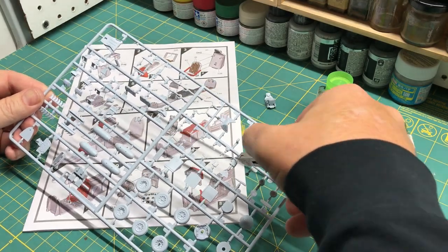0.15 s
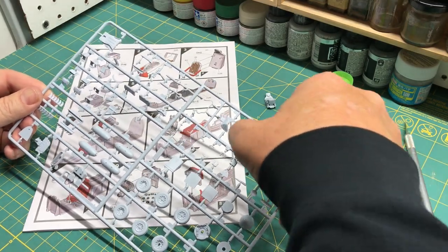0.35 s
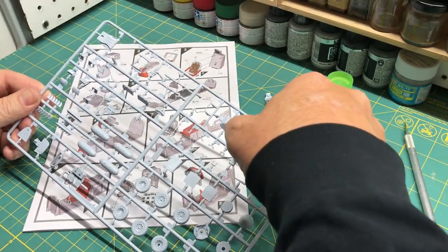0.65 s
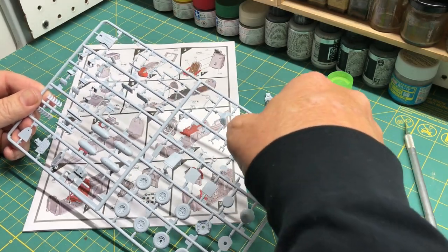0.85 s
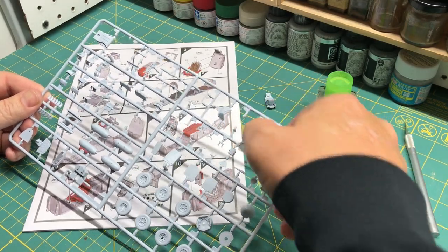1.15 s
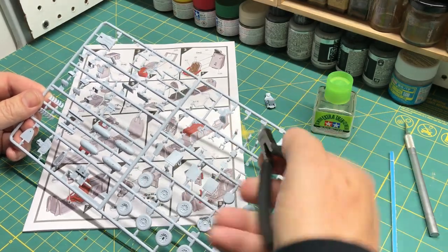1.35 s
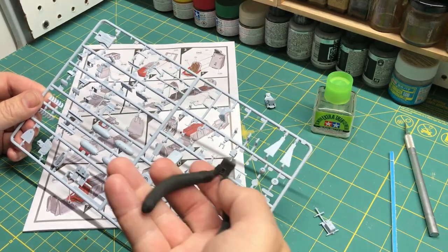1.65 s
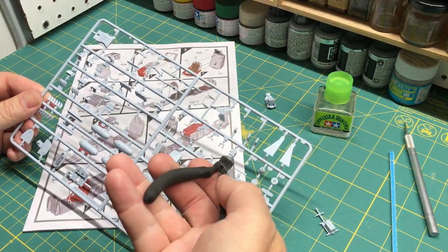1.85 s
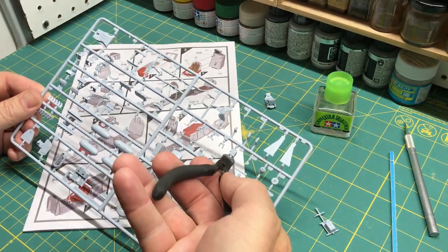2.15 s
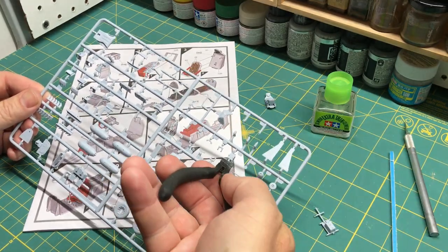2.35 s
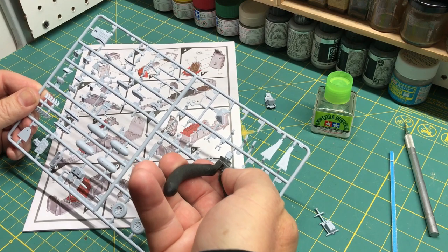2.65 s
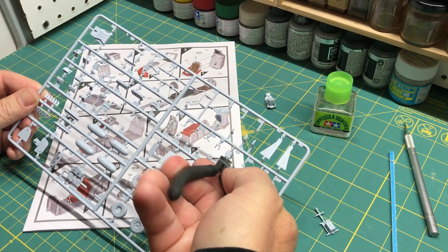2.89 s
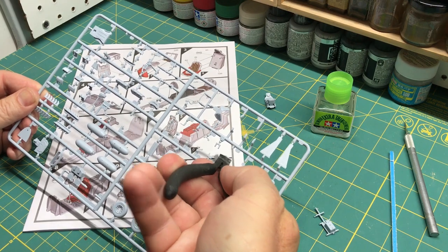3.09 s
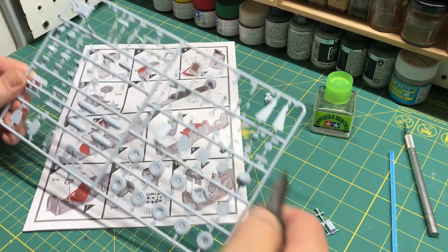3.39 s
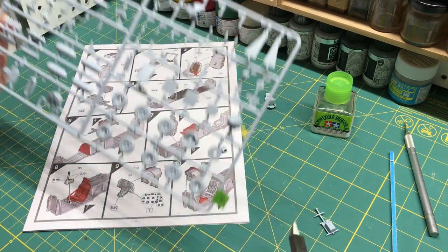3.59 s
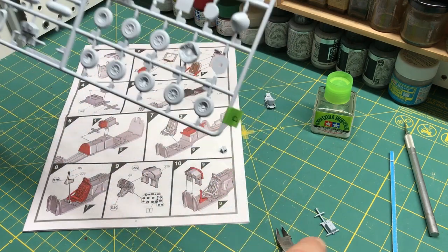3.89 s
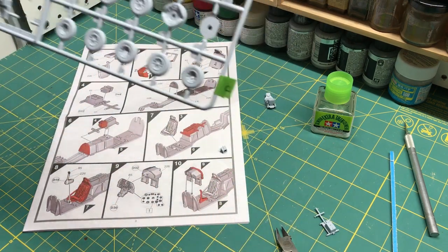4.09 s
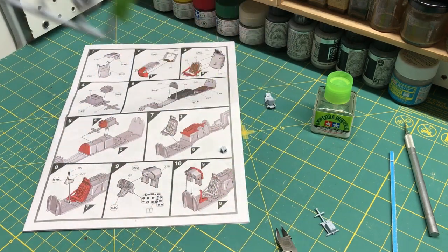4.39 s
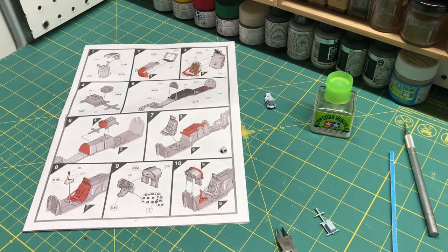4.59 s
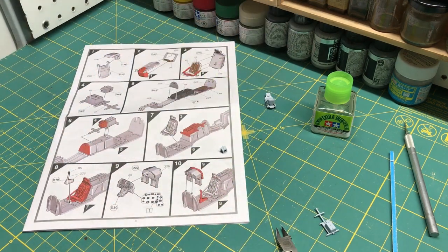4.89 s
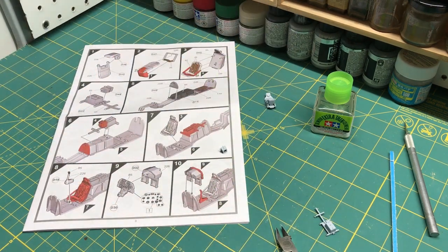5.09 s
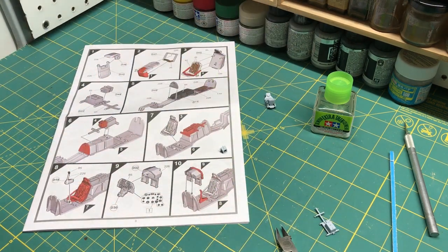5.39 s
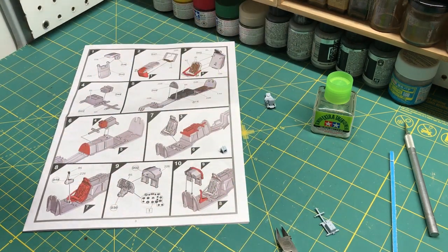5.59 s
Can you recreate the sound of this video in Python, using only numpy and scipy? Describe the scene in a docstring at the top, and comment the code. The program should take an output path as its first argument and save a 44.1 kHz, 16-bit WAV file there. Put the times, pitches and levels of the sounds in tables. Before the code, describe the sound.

A low, gently swelling hum fills a small room throughout, with the microphone close above a desk. At about 0.85 seconds small side cutters snip a part off a plastic frame: one sharp, dry snap with a very short ring of the steel jaws. Only faint rubs and tiny ticks follow until 3 seconds, when a second, softer snip sounds. The light plastic frame clicks and ticks in the hand until about 3.3 seconds. From 3.6 seconds fingers slide and rustle softly, with a few small taps. At about 3.9 seconds the cutters land on the desk mat with a sharp clack, the loudest sound, a hollow knock of the desk top mixed with quick bouncing metal clicks. From about 4.8 to 5.5 seconds the plastic frame gives a few faint ticks and a soft rustle over the hum.

```python
"""A hobby desk in a small, humming room, the microphone just above the cutting mat.
Side cutters snip a plastic part off a sprue: the plastic cracks and the steel jaws slap shut and ring.
The sprue ticks and rustles in the hand, then a second, softer snip frees another part.
The cutters go down on the mat with a sharp clack that rings the desk top.
Last, the sprue is handled softly a little further off."""
import sys
import numpy as np
from scipy import signal
from scipy.fft import rfft, irfft
from scipy.io import wavfile

SR = 44100
rng = np.random.default_rng(int(sys.argv[2]) if len(sys.argv) > 2 else 0)


def materialize(psi):
    """Save the field psi as 16-bit PCM at rate SR to the path in sys.argv[1].

    A 1-D psi becomes a single channel; in a 2-D psi each row is a channel.
    """
    bounded = np.clip(np.atleast_2d(psi).T, -1, 1)
    quanta = np.round(bounded * 32767).astype(np.int16)
    wavfile.write(sys.argv[1], SR, quanta)


N = 253134
TIME = np.arange(N) / SR
RING_TIME = np.arange(SR // 2) / SR  # the half second given to each struck sound


def amp(db):
    """Decibels to gain."""
    return 10 ** (np.asarray(db) / 20)


def unit(x):
    """Scales to rms 1."""
    return x / np.sqrt(np.mean(x ** 2) + 1e-20)


def read_curve(points, hz):
    """Reads a table along a log-frequency axis."""
    points_hz, values = np.transpose(points)
    return np.interp(np.log(hz + 1), np.log(points_hz), values)


def add(mix, start_s, sound):
    """Mixes a sound in at its start time."""
    part = mix[max(round(start_s * SR), 0):][:len(sound)]
    part += sound[:len(part)]


def noise(colour):
    """Steady noise of a given colour, rms 1."""
    gain = amp(read_curve(colour, np.fft.rfftfreq(N, 1 / SR)))
    return unit(irfft(rfft(rng.standard_normal(N)) * gain, N))


def drift(hz):
    """Random wandering, mostly slower than hz, rms 1."""
    gain = np.exp(-(np.fft.rfftfreq(N, 1 / SR) / hz) ** 2)
    return unit(irfft(rfft(rng.standard_normal(N)) * gain, N))


def resonance(hz, width_hz):
    """Noise in one narrow resonance, steady or gliding, rms 1."""
    phase = 2 * np.pi * np.cumsum(hz * np.ones(N)) / SR
    return drift(width_hz) * np.sin(phase) + drift(width_hz) * np.cos(phase)


def ring(modes):
    """A struck body: a sum of sines, each dying by 60 dB in its t60."""
    return sum(amp(db - 60 * RING_TIME / t60) * np.sin(2 * np.pi * hz * RING_TIME)
               for hz, db, t60 in modes)


def crack(colour, t60, tilt_db=0, spot_hz=4000, spot_db=0, spot_octaves=0.27):
    """A sudden burst of dense, fast-dying vibration, coloured by the body it starts in."""
    hz = abs(np.fft.fftfreq(2048, 1 / SR))
    octaves = np.log2((hz + 1) / spot_hz)
    bright_spot = spot_db * np.exp(-(octaves / spot_octaves) ** 2)
    gain = unit(amp(read_curve(colour, hz) + tilt_db * np.maximum(octaves, -2) + bright_spot))
    body = np.fft.ifft(np.exp(np.conj(signal.hilbert(np.log(gain))))).real  # no sound before the onset
    burst = rng.choice([-1, 1], len(RING_TIME)) * amp(-60 * RING_TIME / t60)
    return signal.fftconvolve(burst, body)[:len(RING_TIME)]


# The air of the room. Each row: frequency in Hz, relative noise density in dB.
AIR_COLOUR = [(20, -22), (32, -9.5), (42, 6), (60, 12), (85, 11), (140, 7.5), (200, -3), (330, -4),
              (500, -12.5), (1000, -21.5), (2000, -25), (4500, -29), (9000, -33.5), (12000, -31),
              (16000, -35.5)]

def room_tone(hum_hz=58.7, beat_hz=0.41, crest_s=2.95, hum_db=-55, boom_db=-58.5, air_db=-56):
    """Two close low tones swell and sink as they beat, over the rumble and hiss of the room."""
    phase = 2 * np.pi * hum_hz * TIME + 0.22 * drift(5.17)
    beat = 2 * np.pi * beat_hz * (TIME - crest_s)
    hum = np.sqrt(2) * (np.sin(phase) + amp(-3) * np.sin(phase + beat))
    boom = resonance(hz=55.7, width_hz=8)  # the rumble gathers in one low resonance
    return amp(hum_db) * hum + amp(boom_db) * boom + amp(air_db) * noise(AIR_COLOUR)


# The small room's decay. Each row: frequency in Hz, t60 in seconds.
ROOM_DECAY = [(100, 0.95), (280, 0.33), (550, 0.18), (1000, 0.24), (3000, 0.079), (8000, 0.077),
              (15000, 0.044)]

def room(direct, wet_db, build_s=0.0037):
    """Shelves and jars close to the desk scatter a short tail whose treble dies first."""
    hz, seconds, spectra = signal.stft(rng.standard_normal(len(RING_TIME)), SR, nperseg=256)
    t60 = read_curve(ROOM_DECAY, hz)[:, None]
    tail = signal.istft(spectra * amp(-60 * seconds / t60), SR, nperseg=256)[1][:len(RING_TIME)]
    tail *= 1 - np.exp(-RING_TIME / build_s)
    return direct + amp(wet_db) * signal.fftconvolve(direct, tail / np.linalg.norm(tail))[:N]


# Faintly pitched rubs. Each row: start and length in seconds, first and last pitch in Hz, level in dB.
SQUEAK_GLIDES = [(0, .27, 1330, 1200, -72), (3.69, .16, 1150, 1380, -62), (3.67, .17, 2220, 2220, -70)]

def squeaks(width_hz=110, pitch_lift=0.06):
    """Friction noise in one gliding resonance; pitch and level arch with the speed of the stroke."""
    out = np.zeros(N)
    for start, length, first_hz, last_hz, db in SQUEAK_GLIDES:
        progress = np.clip((TIME - start) / length, 0, 1)
        arch = 4 * progress * (1 - progress)
        hz = (first_hz + (last_hz - first_hz) * progress) * (1 + pitch_lift * arch)
        out += amp(db) * np.sqrt(arch) * resonance(hz, width_hz)
    return out


# Fingers, sleeve and cutters slide. Each row: start and length in seconds, rub and hiss levels in dB.
HAND_STROKES = [(0, 0.12, -70.5, -81), (0.911, 0.052, -69, -79), (1.225, 0.038, -66.5, -78),
                (1.354, 0.27, -78, -74.5), (2.375, 0.044, -61.5, -83), (3.013, .06, -73, -73),
                (3.154, 0.12, -74, -72), (3.278, .05, -67, -72), (3.356, 0.077, -76, -70),
                (3.646, 0.078, -60, -62.5), (3.736, 0.053, -59.5, -59.5), (3.839, 0.037, -56, -60.5),
                (5.079, 0.049, -80, -67.5), (5.198, 0.22, -81, -70)]
# The dull rub and the fine hiss. Each row: frequency in Hz, relative level in dB.
DULL_RUB_COLOUR = [(120, -30), (350, 0.5), (600, 5), (1000, 3), (1400, 0.5), (2000, -19), (4000, -13.5),
                   (9000, -33.5)]
FINE_HISS_COLOUR = [(600, -5), (2000, 5.5), (3700, 5.5), (6000, 2.5), (9000, 5.5), (10600, 3.5), (13500, 2),
                    (16000, -2.5)]

def sliding(attack_s=0.01, release_s=0.049, catches_per_s=700, grit_db=-5.5):
    """Friction of skin and cloth: a dull rub, partly through the sprue's frame, and a gritty hiss."""
    rub_gain, hiss_gain = amp(-80), amp(-82)  # the hands are never quite still
    for start, length, rub_db, hiss_db in HAND_STROKES:
        rise = np.clip((TIME - start) / attack_s, 0, 1)
        speed = rise * np.exp(-np.maximum(TIME - start - length, 0) / release_s)
        rub_gain = np.maximum(rub_gain, amp(rub_db) * speed)
        hiss_gain = np.maximum(hiss_gain, amp(hiss_db) * speed)
    grip = unit(amp(1.6 * drift(120)))  # catches and slips
    frame = unit(signal.fftconvolve(rng.standard_normal(N), np.diff(ring(FRAME_MODES)))[:N])
    catches = rng.standard_normal(N) * (rng.random(N) < catches_per_s / SR)
    grit = unit(signal.fftconvolve(catches, crack(PLASTIC_COLOUR, t60=0.013))[:N])
    rub = unit(noise(DULL_RUB_COLOUR) + amp(-2) * frame)
    hiss = unit(noise(FINE_HISS_COLOUR) + amp(grit_db) * grit)
    return grip * (rub_gain * rub + hiss_gain * hiss)


# The sprue in the hand. Each row: start in seconds, tick level in dB, bright spot in Hz,
# its boost in dB, gain of the frame's ring in dB.
SPRUE_TICKS = [(1.242, -54, 1570, 25, -56.5), (1.889, -61.5, 4030, 7, -61), (3.1079, -38, 4180, 12, -42.5),
               (3.169, -55, 3940, 6, -76), (3.1837, -48.5, 4150, 14, -53), (3.221, -56, 3800, 3, -65),
               (3.2366, -51.5, 3700, 4, -61), (3.310, -57, 3420, 12, -67), (3.322, -55.5, 1580, 26, -56),
               (4.794, -50, 5210, 23, -81), (5.088, -56, 6440, 5, -78), (5.443, -51.5, 3970, 3, -83),
               (5.450, -53, 3700, 9, -74)]
# A tick of plastic. Each row: frequency in Hz, relative level in dB.
PLASTIC_COLOUR = [(400, 1), (1500, -10.5), (3000, -2.5), (6000, -4.5), (10000, -13.5), (13000, -6),
                  (16000, -13)]
# The sprue's plastic frame. Each row: frequency in Hz, relative level in dB, t60 in seconds.
FRAME_MODES = [(448.7, -18.5, 0.14), (590, -6.5, 0.099), (699.4, 0, 0.042), (895, -22, 0.11),
               (1032, -5.5, 0.028), (1227, -28.5, 0.059), (1590, -13.5, 0.03), (1760, -16.5, 0.023)]

def sprue():
    """Small parts flick and catch; each tick shakes the light frame."""
    out = np.zeros(N)
    for start, tick_db, spot_hz, spot_db, frame_db in SPRUE_TICKS:
        tick = crack(PLASTIC_COLOUR, t60=0.029, spot_hz=spot_hz, spot_db=spot_db)
        add(out, start, amp(tick_db) * tick + amp(frame_db) * ring(FRAME_MODES))
    return out


# The desk top under the mat. Each row: frequency in Hz, relative level in dB, t60 in seconds.
DESK_MODES = [(101, -24, 0.059), (197, -27.5, .12), (237.5, -11.5, 0.2), (305, -15, 0.21),
              (320, -15, 0.063), (404.2, 4.5, 0.06), (498, -10, 0.049), (568, -15, .055),
              (643, -4.5, 0.0652), (678, -2.5, 0.055), (792, -1.5, .06), (889, -4, 0.067), (960, 4, 0.042),
              (1044, -12.5, 0.065), (1133, -8, 0.039), (1201, -2, 0.031), (1324, -9.5, 0.026),
              (1420, -10, 0.033), (1484, -16, 0.046), (1631, -15.5, 0.062), (1850, -26, 0.044),
              (3320, -8.5, 0.038)]

def desk_blow(travel_s=0.00125, lowest_hz=125):
    """One blow on the desk top: bending waves carry the treble ahead of the bass."""
    hz = np.fft.rfftfreq(len(RING_TIME), 1 / SR)
    lag = np.exp(-4j * np.pi * travel_s * np.sqrt(1000 * hz))  # travel_s is the delay at 1 kHz
    radiation = (1j * hz / (1j * hz + lowest_hz)) ** 2  # slow bending hardly moves the air
    return irfft(rfft(ring(DESK_MODES)) * lag * radiation, len(RING_TIME))


# The cutters meet the mat below the microphone. Each row: start in seconds, thud gain in dB,
# contact cut-off in Hz, click level in dB, click tilt in dB per octave.
MAT_KNOCKS = [(3.6540, -51, 2220, -57, 2), (3.7420, -54, 3000, -67.5, -4.5), (3.8503, -34, 1010, -37, -5),
              (3.9211, -18, 1510, -29, -1.5), (3.9330, -19, 1240, -23.5, -4.5),
              (3.9393, -37.5, 1050, -31, 5), (3.9436, -36, 1180, -40.5, -2.5),
              (3.9541, -35, 2400, -40, -0.5), (3.9741, -35, 1600, -36.5, -4)]
# The click of the steel head. Each row: frequency in Hz, relative level in dB.
STEEL_COLOUR = [(300, -8), (1500, 11.5), (2200, 1), (3300, 5), (4300, 1.5), (6000, 2.5), (8000, 0.5),
                (9800, 1), (11000, -2), (13000, 3.5), (16000, -8.5)]

def cutters_put_down():
    """Soft handles thud into the desk top, and the steel head clicks as it lands and bounces."""
    out, blow = np.zeros(N), desk_blow()
    for start, thud_db, contact_hz, click_db, tilt_db in MAT_KNOCKS:
        thud = signal.lfilter(*signal.butter(2, contact_hz, fs=SR), blow)  # a softer contact is duller
        click = crack(STEEL_COLOUR, t60=0.033, tilt_db=tilt_db)
        add(out, start, amp(thud_db) * thud)
        add(out, start + 0.0005, amp(click_db) * click)  # the mat yields before the steel strikes
    return out


# The jaws break a gate, the neck that holds a part. Each row: start in seconds, crack level in dB,
# its t60 in seconds, gain of the jaws' ring in dB, level of the sprue's buzz in dB.
GATE_CUTS = [(0.8476, -22.5, 0.023, -21.5, -44.5), (3.0064, -28, 0.02, -41, -48)]
# The cracks, one list for each cut. Each row: frequency in Hz, relative level in dB.
CUT_COLOURS = [
    [(300, -9), (1350, -21), (1800, -4), (2750, -13), (3500, -1), (4400, -14.5), (5000, -5.5), (6200, -11),
     (7600, 2), (9500, -1.5), (10700, -9), (11600, -3.5), (13400, -2), (14100, -11), (15500, -4.5)],
    [(300, -19), (1100, -7), (1600, -19.5), (2200, -12.5), (2900, -1), (3700, -6), (5000, 2), (6500, -8),
     (7300, -6), (8500, -9), (10000, -9.5), (13400, -5), (15500, -17)],
]
# The steel jaws. Each row: frequency in Hz, relative level in dB, t60 in seconds.
JAW_MODES = [(1720, -29, 0.074), (3170, -19, 0.044), (3740, -19.5, .035), (7720, -10, 0.035),
             (9060, -34, 0.021), (9600, -25, .022), (13402, -19, .02)]

def snips(break_s=0.0003):
    """Close to the microphone the plastic gives way, the jaws slap shut and the sprue springs back."""
    out = np.zeros(N)
    tear = 1 - np.exp(-RING_TIME / break_s)  # the break takes a moment to run through the gate
    for (start, crack_db, t60, jaws_db, buzz_db), colour in zip(GATE_CUTS, CUT_COLOURS):
        snap = amp(crack_db) * crack(colour, t60) + amp(jaws_db) * ring(JAW_MODES)
        buzz = crack(PLASTIC_COLOUR, t60=0.07, tilt_db=4)
        add(out, start, tear * snap)
        add(out, start + 0.002, amp(buzz_db) * buzz)
    return out


def scene():
    """Everything at the desk, heard in mono from just above it."""
    in_hand = room(snips() + sprue(), wet_db=-13)
    on_desk = room(cutters_put_down(), wet_db=-23)
    return (in_hand + on_desk + sliding() + squeaks() + room_tone())[None]


# Narrow dips in the microphone's treble. Each row: centre in Hz, half width in Hz, gain in dB.
TREBLE_DIPS = [(4930, 200, -2.5), (7700, 230, -4), (10430, 300, -8.5)]

def record(dry, edge_hz=16000):
    """The microphone's colour, then the recorder's band limit."""
    hz = np.fft.rfftfreq(N, 1 / SR)
    dips = [1 + (amp(db) - 1) / (1 + 1j * (hz - centre) / width) for centre, width, db in TREBLE_DIPS]
    heard = irfft(rfft(dry) * np.prod(dips, axis=0), N)
    low_pass = signal.firwin(511, edge_hz, window=("kaiser", 9), fs=SR)
    return signal.oaconvolve(heard, low_pass[None], "same")


dry = scene()
out = record(dry)
materialize(out)
```